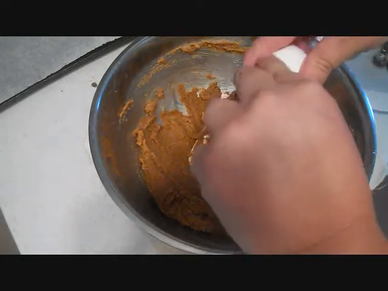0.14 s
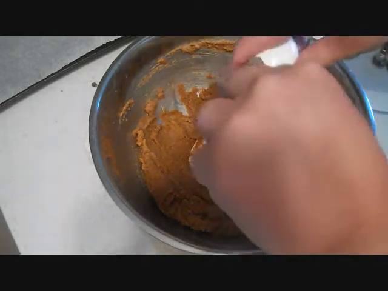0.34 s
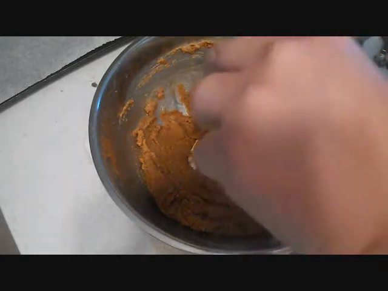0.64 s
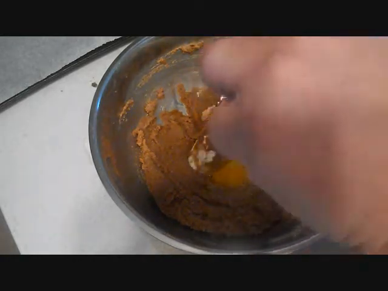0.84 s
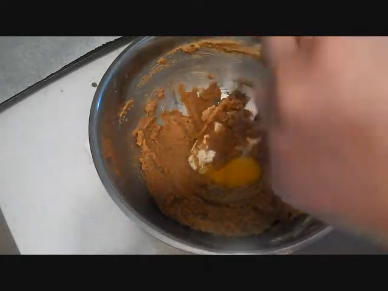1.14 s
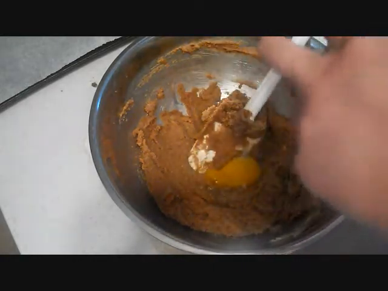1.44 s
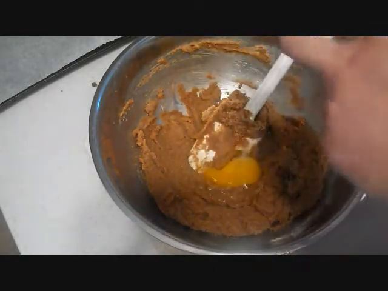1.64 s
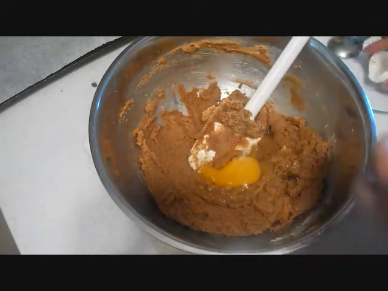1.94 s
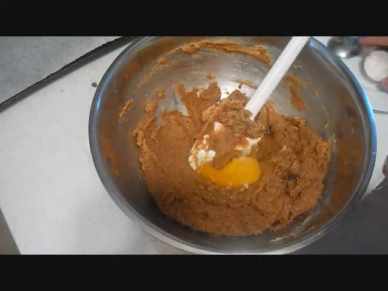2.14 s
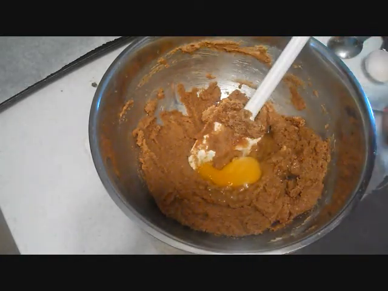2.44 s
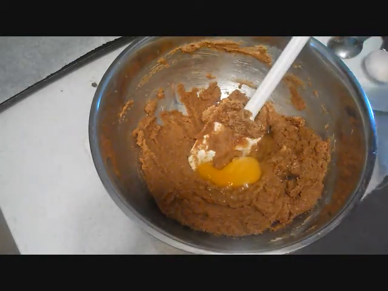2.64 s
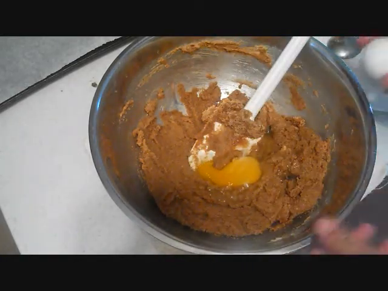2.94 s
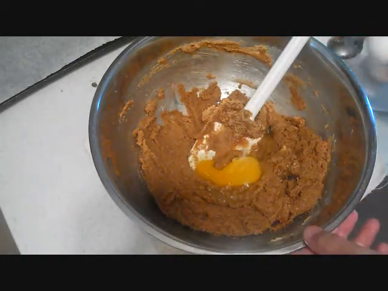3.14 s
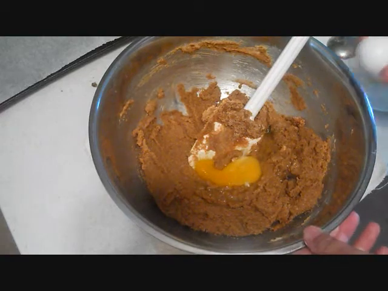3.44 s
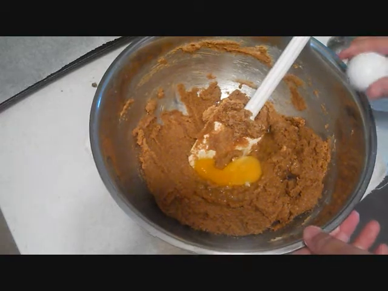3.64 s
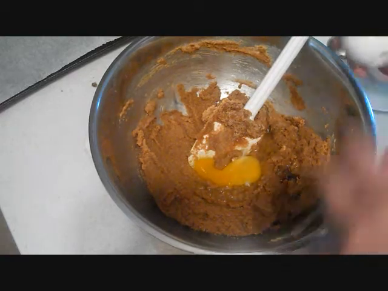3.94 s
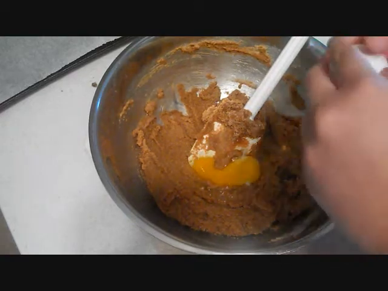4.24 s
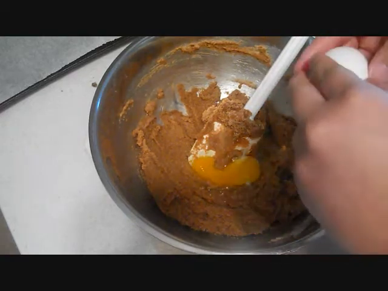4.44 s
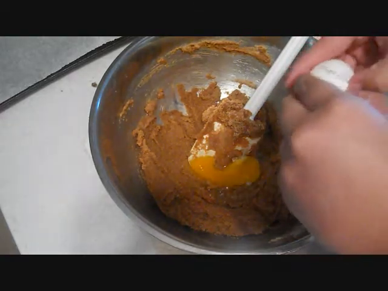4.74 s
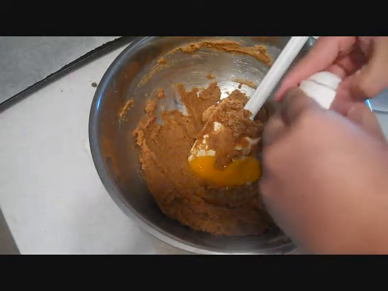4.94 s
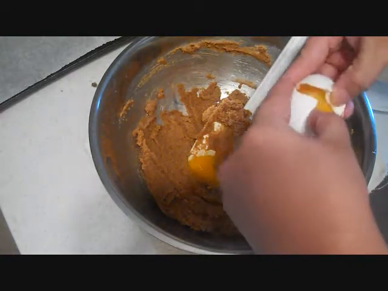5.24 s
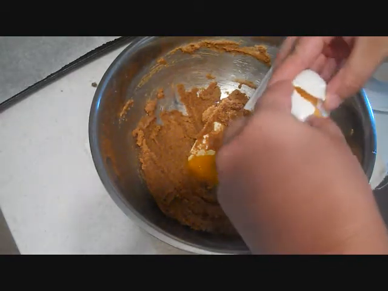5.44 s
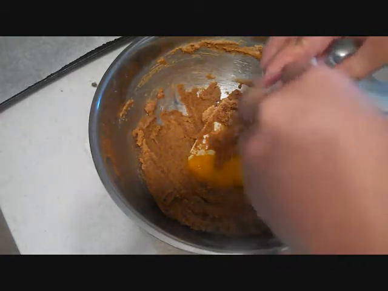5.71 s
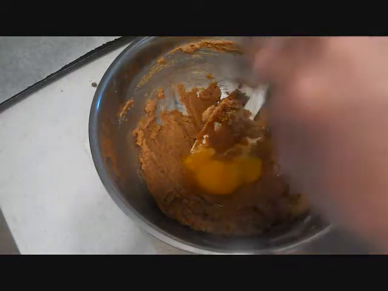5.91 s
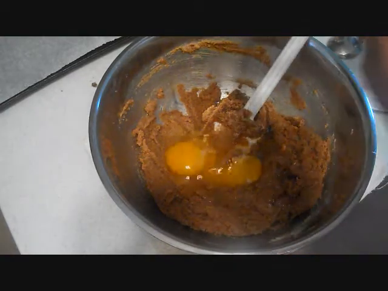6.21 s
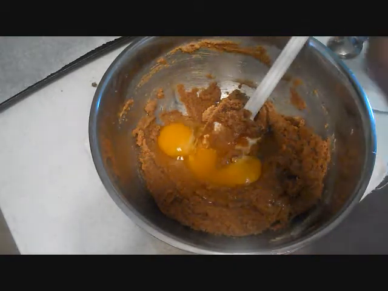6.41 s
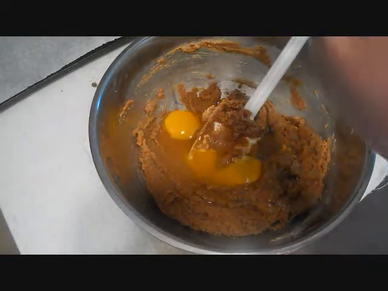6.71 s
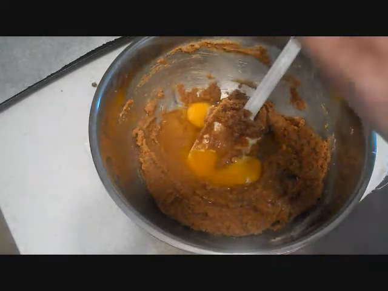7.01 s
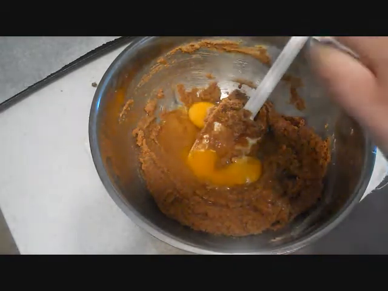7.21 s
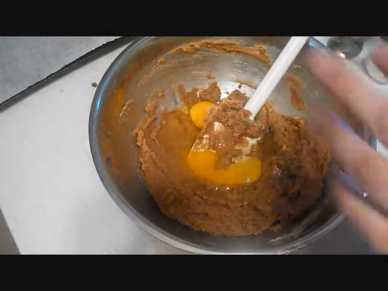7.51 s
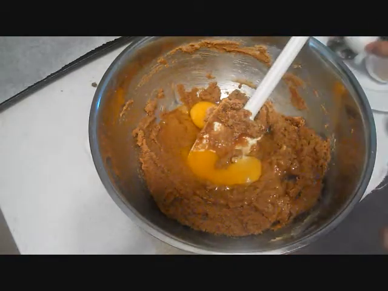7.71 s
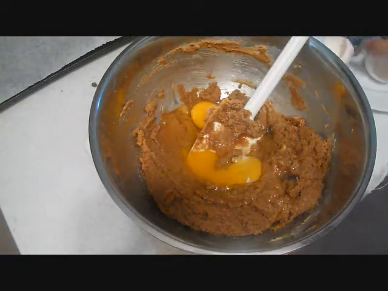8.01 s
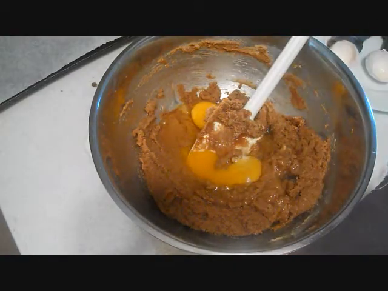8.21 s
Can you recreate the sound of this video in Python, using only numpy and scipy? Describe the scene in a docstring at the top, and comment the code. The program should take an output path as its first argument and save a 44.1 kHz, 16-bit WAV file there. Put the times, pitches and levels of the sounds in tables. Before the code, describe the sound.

Close, slightly dull microphone in a small humming kitchen. Eggshell snaps at once, crackles and crunches in the fingers, then the halves clatter on a dish. A new egg is knocked three times on a steel bowl rim, with a short metallic ring. After a quiet gap, the shell splits in sharp ticks, crunches harder, and a last shell drops loudly on the dish.

```python
"""An egg is knocked three times on the steel rim of a mixing bowl, the third blow a close double: shell crush,
ringing bowl modes, a thud. Half shells snap (tick and splinters through resonances), crunch in the fingers
(dense ringing grains and fizz) and clatter on a dish (a rattle through resonances); the counter takes soft bumps.
Behind is a humming kitchen: noise with drone bands on a set level curve, low just after the knocks.
A dull microphone path flattens the highest peaks."""
import sys
import numpy as np
from scipy import signal
from scipy.fft import rfft, irfft, next_fast_len
from scipy.io import wavfile
from scipy.ndimage import uniform_filter1d

SR = 44100
rng = np.random.default_rng(int(sys.argv[2]) if len(sys.argv) > 2 else 0)


def master(y):
    """Save y as 16-bit WAV."""
    cut = np.clip(np.atleast_2d(y).T, -1, 1)
    pcm = np.round(cut * 32767)  # scale
    wavfile.write(sys.argv[1], SR, pcm.astype(np.int16))


N = 368676

# egg on rim: t/s, nominal peak/dB, bass, middle and treble added by this spot of the rim/dB,
# ring/dB, thud/dB, share of the free decay time/1
KNOCKS = [(3.037, 5.5, -2, -1.5, -2.5, -7, -14, 0.82), (3.314, 2, 2, -13, -2, -9, -26, 0.88),
          (3.64, 0.5, -5, -4, 4, -12, -24, 0.94), (3.65, -10.5, -3, -6, 9, 6.5, -25, 0.82)]
# modes of the batter-damped bowl: f/Hz, relative level/dB, free t60/s
BOWL_MODES = [(586, -10, 0.12), (745, -7, 0.07), (999, 3, 0.06), (1147, 6, 0.055), (1236, -6, 0.08),
              (1921, 3, 0.14), (2142, -9.5, 0.15), (2490, -8, 0.09), (2740, -5, 0.12), (2930, -1, 0.15),
              (3330, -7, 0.25), (3590, 4, 0.09), (3960, 0, 0.14), (4300, -9, 0.1), (5286, -5, 0.12),
              (5600, -10, 0.12), (5740, -6, 0.08), (5970, -4, 0.06), (6140, -10, 0.12)]
# crush of shell on the rim: low f/Hz, high f/Hz, free t60/s, relative level/dB
CRUSH_BANDS = [(440, 1340, 0.08, -19), (940, 1300, 0.12, -21), (1360, 2300, 0.068, -15.5),
               (2505, 2820, 0.19, -24), (3060, 4400, 0.054, -8.5), (5130, 6400, 0.048, -8),
               (7400, 9800, 0.031, -18.5)]
# shells dropped on a dish: t/s, nominal peak/dB, treble/dB, body t60/s, shell's own note f/Hz, note/dB
DROPS = [(2.1383, -0.5, -20, 0.084, 2220, 18), (2.1527, -9.5, 15, 0.25, 3330, 6),
         (2.166, -19, -10, 0.083, 3260, 7), (2.1764, -15, -12, 0.043, 2060, -7.5),
         (7.9519, 9.5, -45, 0.039, 3080, -21), (8.0244, -21, 1.5, 0.13, 2760, 9),
         (8.1185, -34.5, -27, 0.18, 1720, 25), (8.181, -43, -22, 0.12, 1670, 0)]
# dish resonances: f/Hz, width/Hz, relative level/dB
DISH_MODES = [(885, 60, -5), (1760, 140, 6), (2290, 460, 6), (2670, 250, -10.5), (3285, 50, 8.5),
              (4500, 440, 2), (5100, 860, 9.5), (7650, 200, -1), (9400, 140, 8)]
# shell snaps: t/s, nominal peak/dB, hollow f/Hz, plate f/Hz, plate over hollow/dB, splinter t60/s
SNAPS = [(0.0474, -6, 1540, 4400, -10, 0.035), (0.0788, -6.5, 1610, 5110, 1.5, 0.027),
         (0.0866, -17, 1490, 4760, -3, 0.043), (0.1078, -12.5, 1540, 4360, 0, 0.035),
         (0.1288, -12.5, 1620, 5200, 1, 0.027), (0.174, -26, 1520, 5200, 6, 0.035),
         (0.1995, -24, 1410, 7720, -11, 0.035), (0.2267, -29.5, 3170, 4060, 8, 0.038),
         (0.279, -27.5, 1780, 5400, -1, 0.032), (0.3034, -24, 1860, 5800, -3, 0.046),
         (0.323, -26, 1890, 5040, -1, 0.043), (0.3432, -26, 1920, 3680, -1, 0.035),
         (0.376, -20.5, 2800, 4600, 19, 0.031), (1.1902, -8.5, 2160, 6230, -7.5, 0.062),
         (1.201, -13.5, 3260, 5700, -10, 0.025), (1.345, -11, 2080, 3500, -8, 0.04),
         (1.3568, -11.5, 3460, 3500, -12, 0.027), (1.3714, -10, 2010, 5500, -18, 0.064),
         (1.3822, -7, 1660, 6100, -4, 0.044), (1.4157, -13, 1690, 5710, -25, 0.035),
         (1.433, -13, 1650, 3620, -33, 0.035), (1.4674, -5, 1550, 5500, -20, 0.076),
         (1.4778, -13, 1500, 5620, -13, 0.044), (1.5023, -20, 1450, 3660, -13, 0.039),
         (1.5176, -17, 1550, 3580, -8, 0.04), (1.529, -26, 2900, 3970, 3, 0.035),
         (1.542, -27, 1580, 3630, -7, 0.035), (1.5718, -22, 3100, 5280, 11, 0.035),
         (2.0994, -1.5, 1570, 8200, -4, 0.062), (4.555, -26, 1460, 5980, -1, 0.031),
         (4.574, -20, 1740, 4980, -2, 0.025), (4.6149, -23, 1270, 5030, -5, 0.039),
         (4.6985, -5, 2330, 5430, 10, 0.017), (4.7134, -10, 1230, 7400, -4, 0.041),
         (4.7453, -7, 1400, 6300, 4, 0.028), (4.7597, -13, 2170, 6570, -2, 0.027),
         (4.7686, -14.5, 1720, 8350, 4, 0.044), (4.8224, -26.5, 1400, 5070, 0, 0.032),
         (4.8404, -30.5, 2160, 4040, -5, 0.035), (4.897, -29, 1270, 5290, -3, 0.032),
         (4.9795, -27, 2680, 7640, 17, 0.032), (5.1, -26, 2020, 4350, 13, 0.032),
         (5.1558, -11, 3100, 3550, -14, 0.028), (5.1611, -25.5, 2870, 3730, -16, 0.035),
         (5.191, -25.5, 1340, 3630, 2, 0.035), (5.4075, -16.5, 2350, 6000, -10, 0.035),
         (5.5199, -26, 1760, 5410, -16, 0.035), (5.5417, -14.5, 1490, 5500, -16, 0.04),
         (5.547, -13.5, 1500, 5190, -14, 0.051), (5.5781, -2.5, 1850, 6080, -1.5, 0.031),
         (5.585, -2.5, 1640, 3500, -5, 0.04), (5.6271, -23, 3150, 3910, -19, 0.035),
         (6.2893, -20, 1560, 3790, -38, 0.044), (6.371, -23, 1340, 3770, -24, 0.032),
         (6.4103, -16.5, 1600, 6310, -12, 0.045), (6.4355, -23, 1280, 6520, -14, 0.035),
         (6.5159, -11, 1620, 6760, 0, 0.027), (6.5322, -18, 2900, 3590, -19, 0.035),
         (6.553, -7, 2140, 6300, 0, 0.035), (6.5598, -11, 1700, 7110, -14, 0.052),
         (6.6962, -9.5, 2920, 5820, -12, 0.044), (6.748, -13.5, 2460, 6750, -4, 0.039),
         (6.775, -13, 2480, 8500, 8, 0.052), (6.8438, -5.5, 1740, 3870, -29, 0.03),
         (6.8912, -16, 1790, 3720, -18, 0.039), (6.9371, -26, 1920, 3690, -21, 0.035),
         (6.9909, -2, 1880, 5500, -10, 0.044), (7.0094, -6, 2640, 5800, -8, 0.035),
         (7.0624, -16.5, 2550, 6600, -1, 0.035), (7.0757, -15.5, 2600, 3540, -25, 0.038),
         (7.303, -1, 1800, 5940, -15, 0.035), (7.4001, -17, 1790, 4730, -6, 0.035)]
# fingers crush and rub the shell: strongest moment t/s, swell/s, release/s, hollow/dB, hollow f/Hz, fizz/dB
SQUEEZES = [(0.003, 0.017, 0.082, -38, 1385, -31), (.17, .08, 0.12, -46, 1500, -50),
            (.26, .04, .08, -49, 1680, -50), (.33, 0.16, 0.23, -50, 1870, -41.5),
            (1.22, 0.014, 0.13, -42, 1930, -43), (1.34, 0.17, 0.24, -29.5, 1970, -31.5),
            (1.42, 0.097, .06, -23, 1700, -34), (1.49, 0.014, .1, -30, 1600, -37),
            (2.178, 0.042, .12, -35, 2120, -33.5), (4.78, 0.12, 0.082, -51, 1780, -51),
            (5.43, .03, 0.11, -45, 1900, -45), (5.525, 0.027, 0.044, -25, 1710, -40),
            (5.6, .03, 0.033, -62, 1610, -50), (6.42, 0.05, 0.033, -38, 1780, -43),
            (6.58, 0.079, .05, -30, 2100, -34), (6.646, 0.095, 0.1, -20, 2130, -21),
            (6.71, 0.028, 0.015, -29, 2100, -29), (6.76, 0.016, 0.16, -24, 2100, -32.5),
            (6.98, 0.18, 0.081, -29.5, 1910, -33.5), (7.07, 0.066, 0.026, -20, 2030, -31)]
# fizz spectrum: f/Hz, relative density/dB per Hz
FIZZ_SPECTRUM = [(1290, -12), (2200, -12.5), (2710, 0), (3280, -1.5), (3760, -8), (5230, -11.5), (5720, 2),
                 (6600, -13), (9290, -11.5), (10300, -33)]
# soft bumps through the counter: t/s, gain/dB, f/Hz
BUMPS = [(5.39, -31, 60), (5.85, -37, 39.7), (5.89, -32, 47.3), (6.48, -24.5, 38.2), (6.68, -25.5, 35.6)]
# decay of the kitchen's answer: f/Hz, t60/s
KITCHEN_T60 = [(300, 0.2), (2000, 0.25), (6000, 0.24), (10000, 0.19)]
# kitchen hush, rms over time: t/s, level/dB
HUSH_LEVEL = [(0.0, -42.5), (0.32, -44.5), (0.86, -46), (1.28, -36), (1.72, -32), (2.09, -30),
              (2.28, -35.5), (2.98, -33), (3.26, -46), (3.91, -51), (4.33, -48), (4.61, -37), (5.59, -36),
              (5.73, -41), (6.1, -41.5), (6.49, -33.5), (7.15, -30.5), (7.94, -31), (8.0, -49), (8.1, -50)]
# air noise spectrum: f/Hz, relative density/dB per Hz
AIR_SPECTRUM = [(12, -37), (20, -1), (36, 2), (74, -8.5), (125, 0.5), (194, -3.5), (336, 0.5), (448, 0),
                (510, -1), (817, -1), (1650, -9), (2860, -9.5), (4130, -13.5), (5950, -15), (10300, -23.5)]
# appliance drone bands: f/Hz, width/Hz, lift/dB
DRONE_BANDS = [(115.4, 7.4, 5), (163, 10.5, 7.5), (370, 10, 0), (457, 5.4, 10.5), (560, 11, 6),
               (750, 25, -1.5), (5060, 560, 2.5), (5990, 140, 4)]

BASS_HZ, MIDDLE_HZ, TREBLE_HZ = 900, 2620, 4500  # rim spot: bass ends, middle starts, treble starts
DOME_HZ, DOME_DB = 3200, -15.5  # a resonance that every snap shares
SWING_DB = 36.5  # gained over the swell, lost over the release
ROUNDNESS = 1.44  # 1 = pointed squeeze, 2 = rounded
MIC_HZ, TOP_HZ = 10600, 17100
CLIP_LEVEL = 1.02


def knocks():
    """Each blow crushes shell in a burst that dies band by band, rings the bowl's modes and thuds into the counter."""
    out, t = np.zeros(N), np.arange(SR // 2) / SR
    hz, level_db, t60_s = np.transpose(BOWL_MODES)[:, :, None]
    for start_s, peak_db, bass_db, middle_db, treble_db, ring_db, thud_db, free in KNOCKS:
        def spot_db(f):
            regions = [f < BASS_HZ, f > TREBLE_HZ, f > MIDDLE_HZ]
            return np.select(regions, [bass_db, treble_db, middle_db])

        blow = amp(level_db - 15 + spot_db(hz) + rng.normal(0, 1.5, hz.shape))
        # each mode's strength wavers at random, so the ring is rough
        wavering = uniform_filter1d(rng.standard_normal((len(hz), len(t))), size=500)
        phase_s = rng.random(hz.shape) / hz
        modes = (blow * amp(4 * unit(wavering)) * ring(hz, free * t60_s, t + phase_s)).sum(0)

        crush = np.zeros(len(t))
        for low_hz, high_hz, band_t60_s, band_db in CRUSH_BANDS:
            sos = signal.butter(2, [low_hz, high_hz], "band", fs=SR, output="sos")
            band = unit(signal.sosfilt(sos, brittle(t, spiky_db=0.0)))
            crush += amp(band_db + spot_db(low_hz)) * fade(free * band_t60_s, t) * band

        thud = amp(thud_db) * (ring(300, 0.022, t) + ring(160, 0.02, t))
        onset = 1 - np.exp(-t / 0.0018)
        add(out, start_s, peak((amp(ring_db) * modes + crush + thud) * onset, peak_db))
    return out


def snaps():
    """A fracture's tick and splinters, coloured by the hollow of the half shell and a small plate of shell."""
    out, t = np.zeros(N), np.arange(SR // 10) / SR
    for start_s, peak_db, hollow_hz, plate_hz, plate_db, t60_s in SNAPS:
        decay = fade(t60_s, t) + fade(0.0071, t)
        splinters = brittle(t, spiky_db=1.5) * decay * (1 - np.exp(-t / 0.00046))
        splinters[SR // 1500] += 9  # the break itself
        upper_hz = 1.39 * hollow_hz
        upper = resonate(resonate(splinters, upper_hz, width_hz=1900), upper_hz, width_hz=1900)
        hollow = resonate(splinters, hollow_hz, width_hz=174) + 0.44 * upper
        hollow += amp(DOME_DB) * resonate(splinters, DOME_HZ, width_hz=400)
        plate = resonate(splinters, plate_hz, width_hz=180)
        plate += 2.06 * resonate(splinters, 4700, width_hz=3400)
        add(out, start_s, peak(hollow + amp(plate_db) * plate, peak_db))
    # a shell is too small to radiate bass
    return signal.sosfilt(signal.butter(5, 1180, "high", fs=SR, output="sos"), out)


def crunch():
    """Dense tiny fractures: grains ringing near the hollow's pitch, spiky fizz; each squeeze swells and lets go."""
    t = np.arange(N) / SR
    top_s, swell_s, release_s, top_db, pitch_hz, top_fizz_db = np.transpose(SQUEEZES)[:, :, None]
    distance = np.maximum((top_s - t) / swell_s, (t - top_s) / release_s)
    squeeze_db = -SWING_DB * distance ** ROUNDNESS
    hollow_db = (top_db + squeeze_db).max(0)
    fizz_db = (top_fizz_db + squeeze_db).max(0)
    # glides as the shell opens or closes
    hollow_hz = np.interp(t, top_s[:, 0], pitch_hz[:, 0])

    draw = rng.random((12000, 3))
    start = (draw[:, :1] * N).astype(int)
    size = amp(-2.5 * np.log(draw[:, 1:2] + 1e-9))  # few big, many small
    # a light rub squeaks, hard crushing damps the hollow
    cycles = np.interp(hollow_db[start], [-45, -25], [35, 9])
    hz = hollow_hz[start] * np.exp(2.5 / cycles * (draw[:, 2:] - .5))
    k = np.arange(400)
    grains = size * ring(hz, cycles / hz, k / SR)
    hollow = np.bincount((start + k).ravel(), grains.ravel(), minlength=N)[:N]
    fizz = filtered(brittle(t, spiky_db=2.5), lambda f: amp(along(FIZZ_SPECTRUM, f)))
    return amp(hollow_db) * unit(hollow) + amp(fizz_db) * unit(fizz)


def drops():
    """A light shell clatters: its rattle drives the dish's resonances and the shell's own note."""
    out, t = np.zeros(N), np.arange(SR // 4) / SR
    for start_s, peak_db, treble_db, t60_s, note_hz, note_db in DROPS:
        rattle = brittle(t, spiky_db=-3.8)
        body = amp(note_db) * resonate(rattle, note_hz, width_hz=380) * fade(t60_s, t)
        for hz, width_hz, level_db in DISH_MODES:
            high = hz > 4000  # treble depends on the contact and dies sooner
            decay = fade(t60_s * (.6 if high else 1), t)
            body += amp(level_db + treble_db * high) * resonate(rattle, hz, width_hz) * decay
        edge = .5 * amp(treble_db) * np.gradient(rattle) * fade(.6 * t60_s, t)
        onset = 1 - np.exp(-t / 0.0013)
        add(out, start_s, peak((body + edge) * onset, peak_db))
    return out


def bumps():
    """One slow push each: a low sine under a bell-shaped envelope."""
    out = np.zeros(N)
    for start_s, gain_db, hz in BUMPS:
        cycle = np.arange(SR // 10) / SR * hz
        add(out, start_s, amp(gain_db) * np.sin(2 * np.pi * cycle) * np.exp(-(cycle - .6) ** 2 * 3))
    return out


def room(x):
    """Each frequency of the kitchen's answer dies at its own speed; a fresh tail every third of a second."""
    out, step = np.zeros(N), SR // 3
    for i in range(0, N, step):
        hz, t, z = signal.stft(rng.standard_normal(SR // 2), SR, nperseg=256)
        decay = amp(-60 * t / along(KITCHEN_T60, hz)[:, None])
        tail = signal.istft(z * decay, SR, nperseg=256)[1]
        answer = signal.fftconvolve(x[i:i + step], tail / np.linalg.norm(tail))
        add(out, (i + 150) / SR, answer)  # 150 samples = 3.4 ms late
    return out


def hush():
    """Air noise with narrow appliance drone bands, on the set level curve."""
    def response(hz):
        lift_db = sum(db / (1 + (2 * (hz - c) / w) ** 2) for c, w, db in DRONE_BANDS)
        return amp(along(AIR_SPECTRUM, hz) + lift_db)

    noise = filtered(rng.standard_normal(N), response)
    level_s, level_db = np.transpose(HUSH_LEVEL)
    return amp(np.interp(np.arange(N) / SR, level_s, level_db)) * unit(noise)


def brittle(t, spiky_db):
    """Splintering: noise whose strength changes within about a millisecond, by spiky_db rms."""
    strength_db = spiky_db * unit(uniform_filter1d(rng.standard_normal(len(t)), size=40))
    return amp(strength_db) * rng.standard_normal(len(t))


def ring(hz, t60_s, t):
    """A damped sine."""
    return fade(t60_s, t) * np.sin(2 * np.pi * hz * t)


def fade(t60_s, t):
    """Exponential decay, 60 dB in t60_s, which is held within 2 ms to 1 s."""
    return amp(-60 * t / np.clip(t60_s, .002, 1))


def resonate(x, hz, width_hz):
    """x through one resonance, at rms 1."""
    return unit(signal.lfilter(*signal.iirpeak(hz, hz / width_hz, SR), x))


def filtered(x, response):
    """x times a response of frequency."""
    m = next_fast_len(N + SR // 2)
    return irfft(rfft(x, m) * response(np.fft.rfftfreq(m, 1 / SR)), m)[..., :N]


def along(points, hz):
    """(f/Hz, value) points on a log frequency axis."""
    f, v = np.transpose(points)
    return np.interp(np.log(hz + 1), np.log(f + 1), v)


def peak(x, db):
    """x with the rms of its first 5 ms at 10.5 dB below db, so that it swings up to about db."""
    return amp(db - 10.5) * x / np.sqrt(np.mean(x[:SR // 200] ** 2))


def amp(db):
    """dB to amplitude."""
    return 10 ** (np.asarray(db) / 20)


def unit(x):
    """x at rms 1."""
    return x / np.sqrt(np.mean(x ** 2) + 1e-20)


def add(track, start_s, sound):
    """Mix a sound in at start_s."""
    part = track[round(start_s * SR):][:len(sound)]
    part += sound[:len(part)]


def scene():
    """Egg and shells, the crockery and room they excite, bumps and hush."""
    near = knocks() + drops() + snaps() + crunch()
    # something on the counter rings along
    crockery = signal.lfilter(*signal.iirpeak(3330, 130, SR), near)
    return (near + amp(-10.5) * crockery + amp(-13.5) * room(near) + bumps() + hush())[None]


def record(dry):
    """A steep low-pass in the upper treble, then overload that flattens peaks, then a hard top limit."""
    x = signal.sosfilt(signal.ellip(12, .5, 90, MIC_HZ, fs=SR, output="sos"), dry)
    x = x / (1 + np.abs(x / CLIP_LEVEL) ** 12) ** (1 / 12)
    return filtered(x, lambda hz: hz < TOP_HZ)


dry = scene()
out = record(dry)
master(out)
```